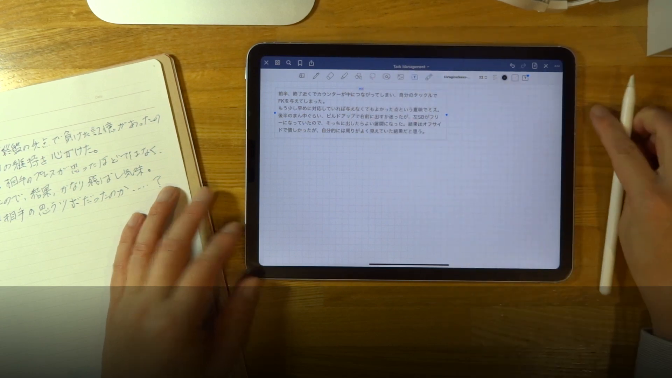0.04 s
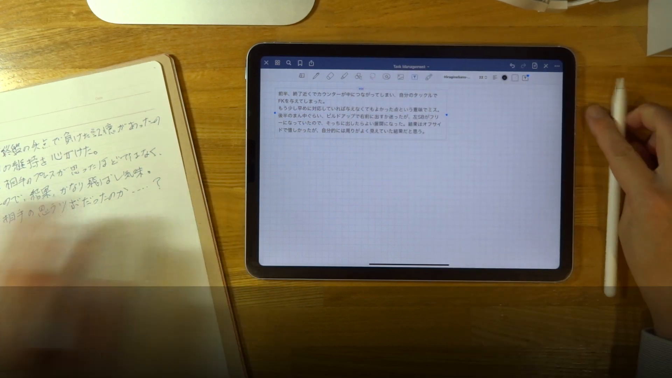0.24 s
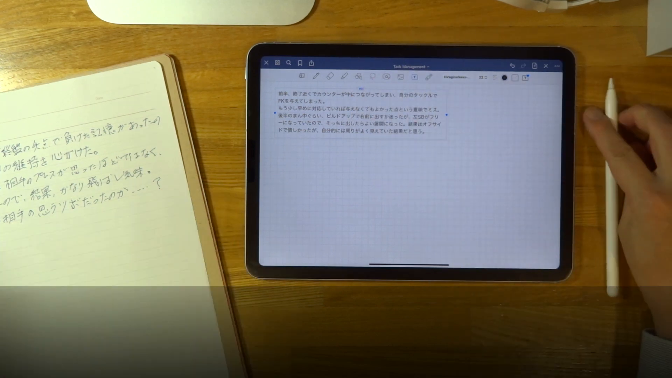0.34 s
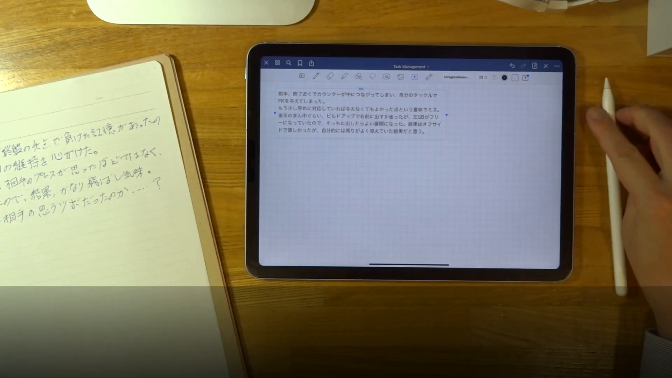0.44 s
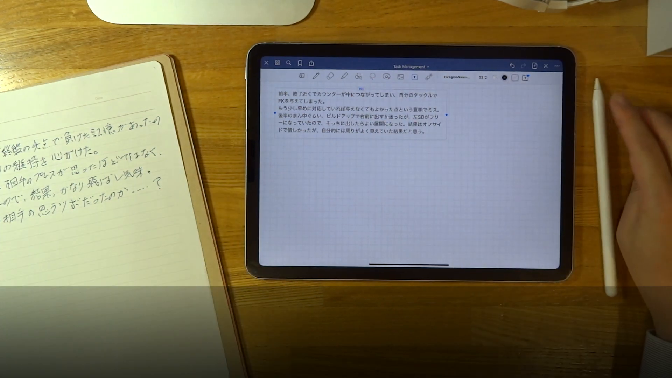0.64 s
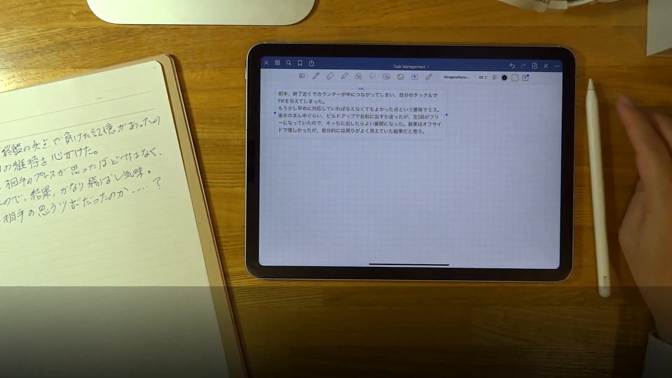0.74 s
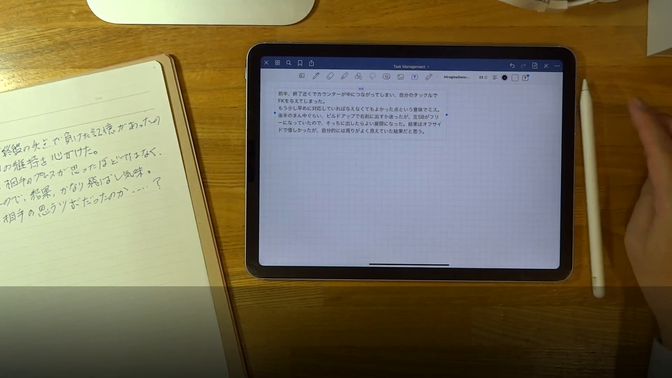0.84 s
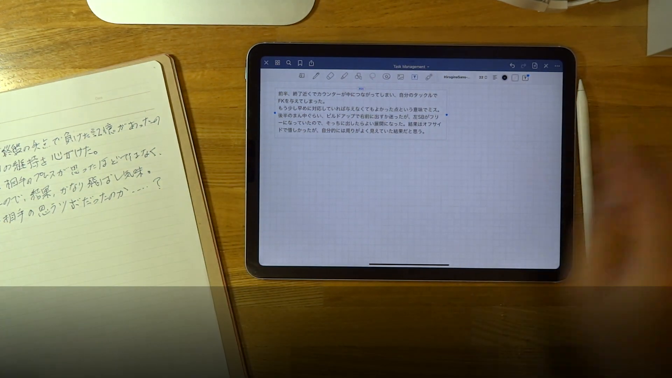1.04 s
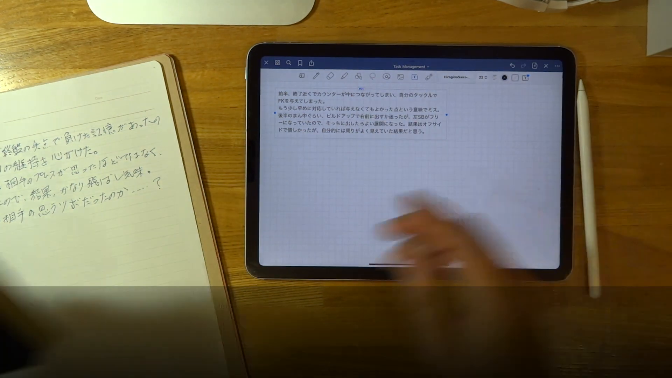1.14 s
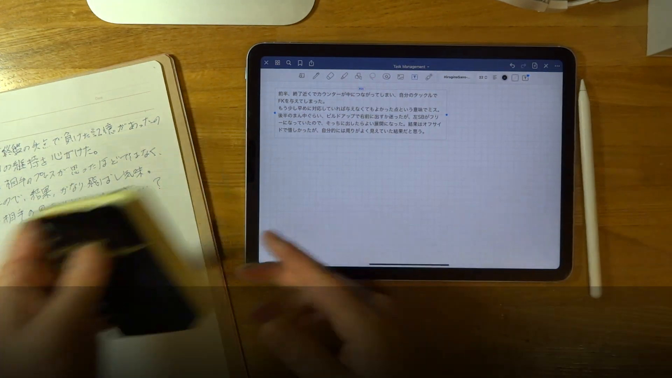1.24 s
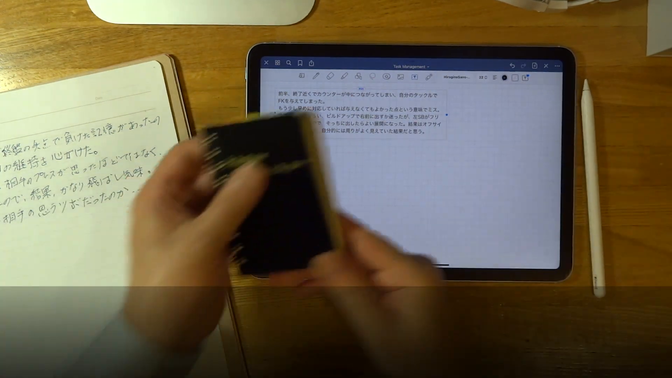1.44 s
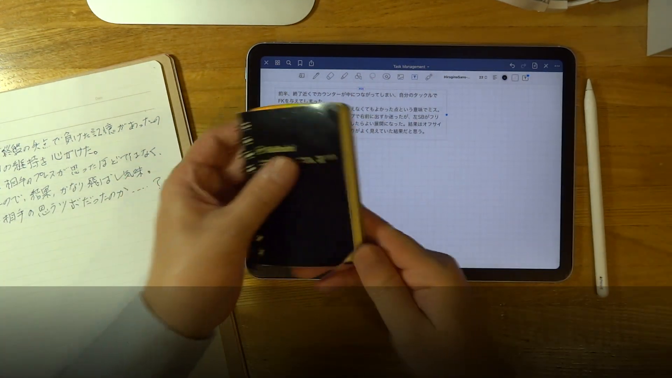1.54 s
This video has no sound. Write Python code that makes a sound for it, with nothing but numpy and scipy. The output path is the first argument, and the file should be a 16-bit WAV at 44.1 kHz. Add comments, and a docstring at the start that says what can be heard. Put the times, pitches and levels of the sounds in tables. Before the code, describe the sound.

A plastic pen drops onto a wooden desk with a sharp clattering bounce, then soft rustling

```python
"""Hands and sleeves brush paper and wood, and a plastic pen squeaks as it slides on a wooden desk.
The pen drops right of a close pair of microphones, bounces and settles: short pushes ring pen and desk.
Light taps of pen, fingers and a notebook ring the same tones; a hand thuds softly as a low, fading swing.
The brushing is shaped noise. A faint room echo, rumble, hiss and two hum tones lie underneath."""
import sys
import numpy as np
from scipy import signal
from scipy.fft import rfft, irfft
from scipy.io import wavfile
from scipy.ndimage import uniform_filter1d

SR = 44100
rng = np.random.default_rng(int(sys.argv[2]) if len(sys.argv) > 2 else 0)


def wrap_up_sound(samples):
    """Save the sound to the file named by the first command line argument, as 16-bit audio."""
    columns = np.atleast_2d(samples).T
    # keep every value between -1 and 1, then stretch to whole-number steps
    tamed = np.clip(columns, -1, 1)
    steps = np.round(tamed * 32767).astype(np.int16)
    wavfile.write(sys.argv[1], SR, steps)


def ratio_of_db(decibels):
    """Turn decibels (scalar or array-like) into linear amplitude factors; 0 dB maps to 1."""
    return 10 ** (np.asarray(decibels, float) / 20)


N = 70560  # length in samples: 1.6 s


def evened(x):
    """Scales a sound to an rms of 1."""
    return x / np.sqrt(np.mean(x ** 2) + 1e-20)


def read(points, hz):
    """Reads a curve between its points, along a logarithmic pitch axis."""
    point_hz, value = np.transpose(points)
    return np.interp(np.log(hz + 1), np.log(point_hz + 1), value)


def add(mix, start_s, sound):
    """Adds a sound to the mix from a given time, cut off at the end of the mix."""
    part = mix[..., round(start_s * SR):][..., :sound.shape[-1]]
    part += sound[..., :part.shape[-1]]


def sides(left_minus_right_db):
    """Gains for left and right that share a level difference equally."""
    return ratio_of_db(np.multiply.outer([.5, -.5], left_minus_right_db))


def noise(colour, same, patch_db, size):
    """Two channels of patchy noise with a given spectrum and left-right likeness."""
    hop = size // 4
    hz = np.fft.rfftfreq(size, 1 / SR)
    a, b, c, d, patches = rng.standard_normal((N // hop + 5, len(hz), 5)).T
    # neighbouring pitches, then neighbouring moments, rise and fall together
    patches = uniform_filter1d(patches, size=9, axis=0)
    patches = evened(uniform_filter1d(patches, size=5, axis=1))
    same = np.clip(same * np.ones(len(hz)), -1, 1)[:, None]
    left = a + 1j * b
    right = same * left + np.sqrt(1 - same ** 2) * (c + 1j * d)
    level = ratio_of_db(read(colour, hz)[:, None] + patch_db * patches)
    return evened(signal.istft(np.array([left, right]) * level, nperseg=size, noverlap=size - hop)[1][:, :N])


# pen blows on the desk: (time [s], relative level [dB], width of the push at half height [ms])
PEN_BLOWS = [(0.2487, -1.5, 0.093), (0.2515, -11, 0.13), (.2592, -6, 0.63), (0.263, -20, 0.082),
             (.2735, -6, 0.15), (.2845, -8.5, 0.92), (0.2875, -9.5, 0.16), (.2965, -21.5, 0.92),
             (0.303, -25, 0.63)]
# left minus right for the pen: (frequency [Hz], level difference [dB])
PEN_SIDE = [(1400, 0), (2400, -3), (4500, -7), (12000, -1)]


def pen():
    """A short push rings the modes and adds a crack, louder for brief contacts; left is later and duller."""
    out = np.zeros((2, N))
    chance = rng.standard_normal((len(PEN_BLOWS), len(RING_MODES)))
    for (start_s, db, contact_ms), scatter in zip(PEN_BLOWS, chance):
        push = np.hanning(max(round(2 * contact_ms * SR / 1000), 1) + 2)
        # each mode is struck 1.5 dB (rms) stronger or weaker by chance
        ringing = np.convolve(ring(1.5 * scatter, 0.68), push / push.sum())[:SR // 4]
        crack_gain = ratio_of_db(3) * .15 / contact_ms
        blow = ratio_of_db(db) * 0.25 * (ringing + crack_gain * crack(.048))
        add(out[0], start_s + .00015, blow[0])  # left lags by 0.15 ms
        add(out[1], start_s, blow[1])
    out = irfft(rfft(out) * sides(read(PEN_SIDE, np.fft.rfftfreq(N, 1 / SR))), N)
    return signal.sosfilt(signal.butter(3, 210, "high", fs=SR, output="sos"), out)  # thins the bass


# ringing tones (modes) of pen and desk top:
# (frequency before detuning [Hz], relative level [dB], time to fade by 60 dB before shortening [s])
RING_MODES = [(136.7, 3, 0.11), (246.3, -3.5, 0.12), (364, -4, 0.08), (483.5, -5, 0.0619),
              (535, -3.5, 0.061), (738.6, -2, 0.0863), (1110, -4, 0.052), (1410, -1.5, 0.029),
              (1685, -5, 0.11), (2270, -0.5, 0.04), (2655, 6, 0.067), (4024, 8.5, 0.046), (4400, 7, 0.012),
              (5573, 12, 0.012)]


def ring(gain_db, stretch):
    """All modes struck at once, each slightly detuned at random, first swing inward."""
    t = np.arange(SR // 4) / SR
    hz, db, t60 = np.transpose(RING_MODES)[:, :, None]
    detune = .02 * np.minimum(hz / 4000, 1)  # rms share; low modes shift less
    hz = hz * (1 + detune * rng.standard_normal(hz.shape))
    fading = ratio_of_db(db + gain_db[:, None] - 60 * t / (t60 * stretch))
    return -(fading * np.sin(2 * np.pi * hz * t)).sum(0)


def coloured(x, colour):
    """Gives a sound a new spectrum and an rms of 1."""
    hz = np.fft.rfftfreq(x.shape[-1], 1 / SR)
    return evened(irfft(rfft(x) * ratio_of_db(read(colour, hz)), x.shape[-1]))


# spectrum of the crack: (frequency [Hz], relative level [dB])
CRACK = [(400, -36.5), (1200, -2), (2200, 1.5), (3300, -4), (5500, -9), (7500, -21), (11500, -13),
         (16000, -34)]


def crack(t60):
    """Broad burst of the many short modes too dense to count, partly shared by both microphones."""
    alike = .82
    t = np.arange(SR // 4) / SR
    shared, *own = rng.standard_normal((3, len(t)))
    burst = alike * shared + np.sqrt(1 - alike ** 2) * np.array(own)
    return ratio_of_db(-60 * t / t60) * coloured(burst, CRACK)


# light taps of fingers, notebook and, at 0.059 s, the pen:
# (time [s], relative level [dB], most strongly struck frequency [Hz],
# softness: fade time of the puff [s], ring length [share of the modes' fade time])
TAPS = [(.059, -51, 4800, .002, .6), (.1065, -43, 660, .003, .3), (.555, -42, 1750, .0035, .45),
        (.9372, -39, 1100, .0005, .7), (.952, -38, 950, .0045, 1.0), (1.0892, -42, 1200, .0004, .2),
        (1.1375, -45, 1300, .0005, .25), (1.341, -46, 1100, .0006, .25), (1.5555, -43, 850, .007, .2),
        (1.562, -36, 1020, .011, .17)]


def taps():
    """A puff of friction strikes modes near the tap's pitch hardest; hard taps reach wider and crack."""
    out = np.zeros((2, N))
    t = np.arange(2000) / SR
    mode_hz, mode_db, _ = np.transpose(RING_MODES)
    for start_s, db, top_hz, soft_s, share in TAPS:
        hard = .0012 / (soft_s + .0012)  # near 0 for soft taps, towards 1 for hard ones
        puff = (1 - hard) * rng.standard_normal(2000) * np.exp(-t / soft_s)
        puff[0] = 8 * hard  # the knock that opens the tap
        reach_octaves = .3 + (2.3 - .3) * hard
        # cancel each mode's own level, so that only nearness to the tap's pitch counts
        near_db = -6 * (np.log2(mode_hz / top_hz) / reach_octaves) ** 2 - mode_db
        tap = signal.oaconvolve(ring(near_db, share), puff)[:SR // 4]
        tap = tap / np.sqrt(2 * uniform_filter1d(tap ** 2, size=100).max())
        add(out, start_s, ratio_of_db(db) * (tap + ratio_of_db(-5) * hard * crack(.014)))
    return out


# soft thuds of a hand through the desk: (time [s], relative level [dB], frequency [Hz])
THUDS = [(0.587, -37, 97)]


def thuds():
    """A low swing that starts softly over 4 ms and fades by 60 dB in 0.11 s."""
    out = np.zeros(N)
    t = np.arange(SR // 5) / SR
    for start_s, db, hz in THUDS:
        fading = ratio_of_db(db - 60 * t / .11) * np.minimum(t / 0.004, 1)
        add(out, start_s, fading * 2 * np.sin(2 * np.pi * hz * t))
    return out


# loudness of the sliding pen's squeak, before its left-right balance: (time [s], level [dB])
SQUEAK = [(0.062, -62), (0.085, -52), (.1, -58), (.110, -47), (0.124, -64), (.178, -60), (.2, -72)]


def squeak():
    """Uneven slips ring one mode of the pen's shell."""
    mode_hz, width_hz = 4130, 380
    time_s, db = np.transpose(SQUEAK)
    slips = rng.standard_normal(N) * (rng.random(N) < 600 / SR)  # about 600 slips a second
    r = np.exp(-np.pi * width_hz / SR)
    tone = signal.lfilter([1, 0, -1], [1, -2 * r * np.cos(2 * np.pi * mode_hz / SR), r * r], slips)
    loudness = ratio_of_db(np.interp(np.arange(N) / SR, time_s, db, -120, -120))
    return evened(tone) * loudness * sides(-8.0)[:, None]  # louder on the right


# spectra of the brushing's treble and middle noise: (frequency [Hz], relative level [dB])
BRUSH_TOP = [(2500, 0.5), (5000, 1.5), (11000, 8.5), (14500, 6.5), (16200, -17.5)]
BRUSH_MID = [(200, -29), (450, -5), (1000, -4.5), (2500, -14.5), (7000, -21.5)]
# strokes of skin and cloth over paper and wood, levels before the uneven catching:
# (start [s], rise [s], hold [s], fall [s], treble level [dB], middle level [dB])
STROKES = [(.0, 0.011, 0.094, 0.035, -99, -58.5), (0.015, 0.081, 0.013, 0.037, -45, -51.5),
           (0.088, 0.011, 0.059, 0.27, -51.5, -67), (0.554, 0.0037, 0.011, 0.018, -76, -57),
           (0.62, 0.014, 0.0072, .015, -65.5, -58.5), (0.707, 0.022, 0.035, 0.065, -72, -48.5),
           (0.781, 0.02, 0.061, 0.027, -57, -55), (0.904, 0.017, 0.076, 0.12, -63.5, -95),
           (1.078, 0.0038, 0.065, 0.044, -55.5, -83), (1.129, 0.031, 0.044, 0.021, -53.5, -89),
           (1.276, 0.11, 0.12, 0.096, -58.5, -56), (1.53, 0.023, 0.025, 0.045, -55.5, -54)]


def brushing():
    """Each stroke swells, holds and fades in treble and middle noise, catching unevenly."""
    t = np.arange(N) / SR
    power = np.zeros((2, N))
    for start_s, rise, hold, fall, top_db, mid_db in STROKES:
        corners = np.cumsum(np.abs([0, rise, hold, fall]))
        shape = np.interp(t - start_s, corners, [0, 1, 1, 0])
        power += (ratio_of_db(np.array([[top_db], [mid_db]])) * shape ** 2.2) ** 2
    scrape = ratio_of_db(2.2 * evened(uniform_filter1d(rng.standard_normal(N), size=300)))  # 2.2 dB rms
    top = noise(BRUSH_TOP, 0.1015, 2.2, size=256) * np.sqrt(power[0]) * sides(1.0)[:, None]
    mid = noise(BRUSH_MID, 0.64, 2.2, size=256) * np.sqrt(power[1])
    return scrape * (top + mid)


# how alike left and right are, in the room and the background: (frequency [Hz], likeness [0 to 1])
SAME = [(60, 1.0), (180, 0.98), (550, 0.86), (1650, 0.14), (15000, 0.0492)]
# how long the room rings: (frequency [Hz], time to fade by 60 dB [s])
ROOM = [(300, 0.27), (1500, 0.3), (10000, 0.16)]


def room(x):
    """Sparse reflections of random sign, each band dying at its own speed; both sides share the bass."""
    hits = np.zeros((2, SR // 2))
    at = np.arange(200, SR // 2 - 20, 20)
    at = at + rng.integers(0, 20, (2, len(at)))  # one hit somewhere in every 20 samples
    np.put_along_axis(hits, at, rng.choice([-1., 1.], at.shape), 1)
    hz, t, z = signal.stft(hits, SR, nperseg=256)
    same = np.clip(read(SAME, hz), 0, 1)[:, None]
    z = np.array([z[0], same * z[0] + np.sqrt(1 - same ** 2) * z[1]])
    fading = ratio_of_db(-60 * t / read(ROOM, hz)[:, None])
    tail = signal.istft(z * fading, SR, nperseg=256)[1]
    return signal.fftconvolve(x.mean(0)[None], tail / np.linalg.norm(tail[0]), axes=1)[:, :N]


# spectrum of rumble and hiss: (frequency [Hz], relative level [dB])
RUMBLE = [(12, -9), (30, 6.5), (60, -3.5), (130, -9), (200, -16.5), (400, -20.5), (800, -26.5),
          (3000, -34.5), (7000, -39), (13000, -37.5), (15800, -42.5)]
# hum tones: (frequency [Hz], level around which it wavers [dB])
HUM = [(98, -57.5), (120, -60)]


def background():
    """Low rumble and hiss from patchy noise, and two wavering hum tones."""
    t = np.arange(N) / SR
    likeness = read(SAME, np.fft.rfftfreq(2048, 1 / SR))
    out = ratio_of_db(-47) * noise(RUMBLE, likeness, 3, size=2048)
    for hz, db in HUM:
        waver = evened(uniform_filter1d(rng.standard_normal(N), size=5000))
        tone = np.sqrt(2) * np.sin(2 * np.pi * (hz * t + rng.random()))
        out = out + ratio_of_db(db + 4.3 * waver) * tone
    return out


def scene():
    """Pen and taps with their room echo, then thuds, squeak, brushing and background."""
    struck = pen() + taps()
    echo = ratio_of_db(-17.5) * room(struck)
    return struck + echo + thuds() + squeak() + brushing() + background()


def low_pass(x):
    """Removes everything above the highest recorded frequency."""
    return signal.sosfilt(signal.butter(12, 17160, fs=SR, output="sos"), x)


def record(dry):
    """Peaks beyond full scale clip; then a steep filter removes the highest treble."""
    clipped = np.clip(dry, -1, 1)
    edge = signal.firwin(255, 15800, window=("kaiser", 8), fs=SR)[None]
    mix = signal.oaconvolve(clipped, edge, "same")
    return low_pass(mix)


dry = scene()
out = record(dry)
wrap_up_sound(out)
```